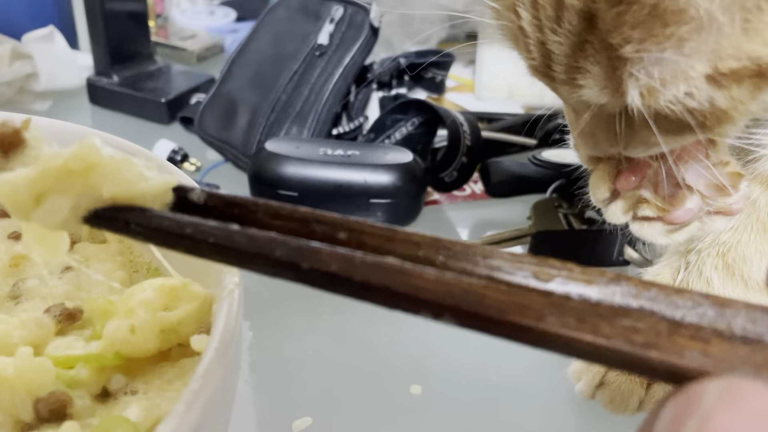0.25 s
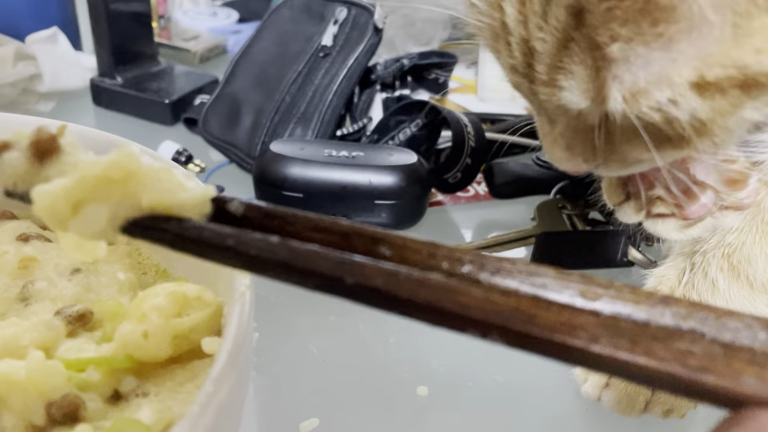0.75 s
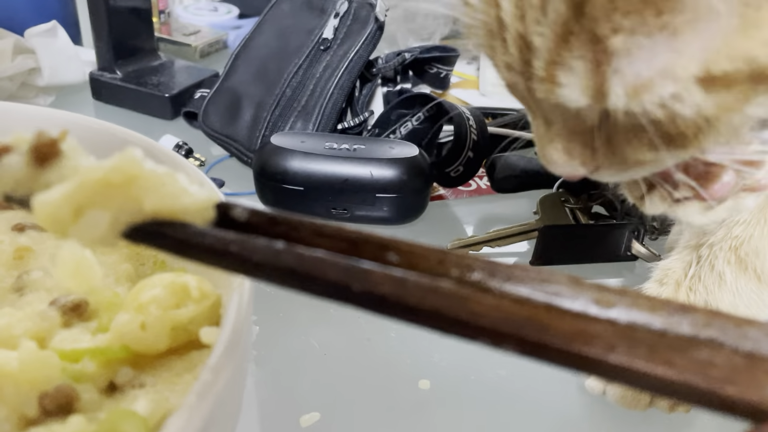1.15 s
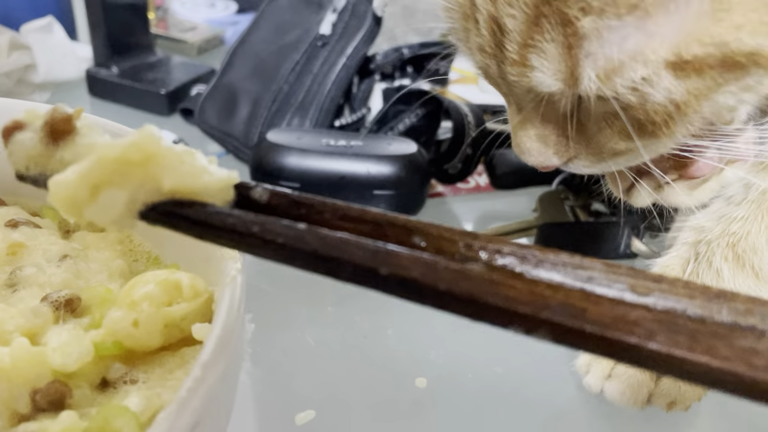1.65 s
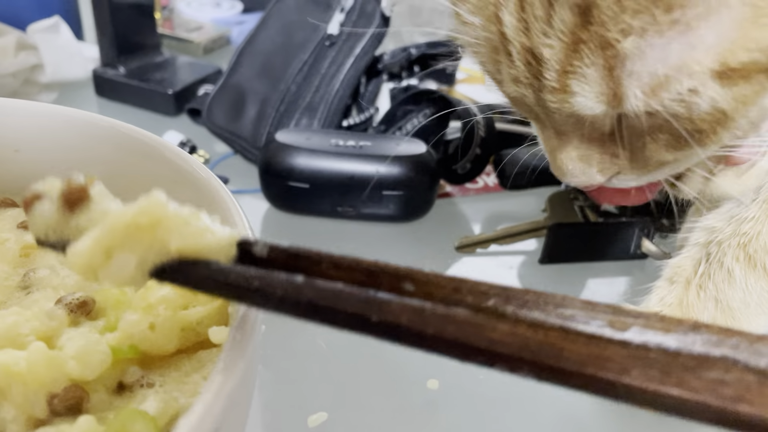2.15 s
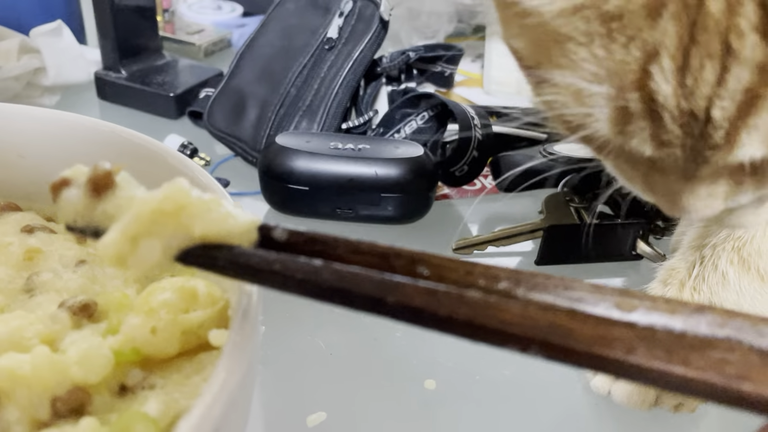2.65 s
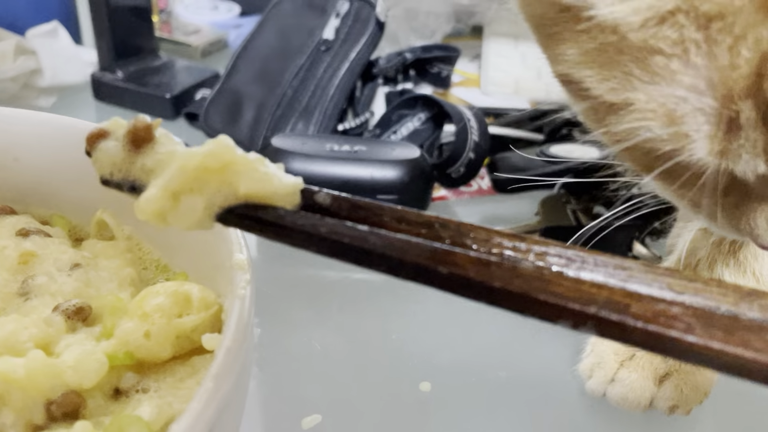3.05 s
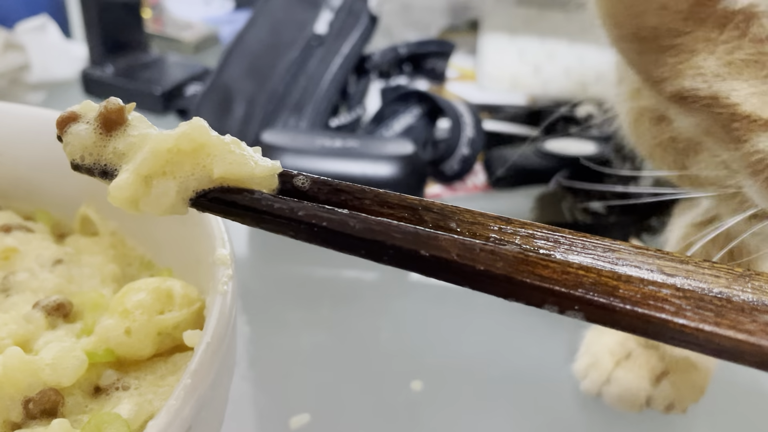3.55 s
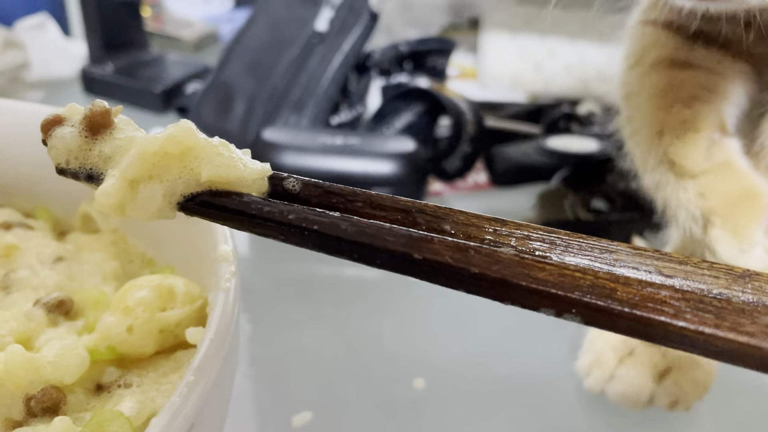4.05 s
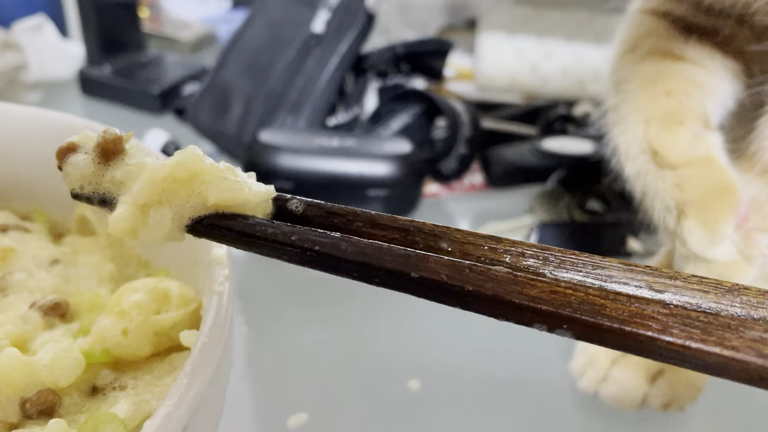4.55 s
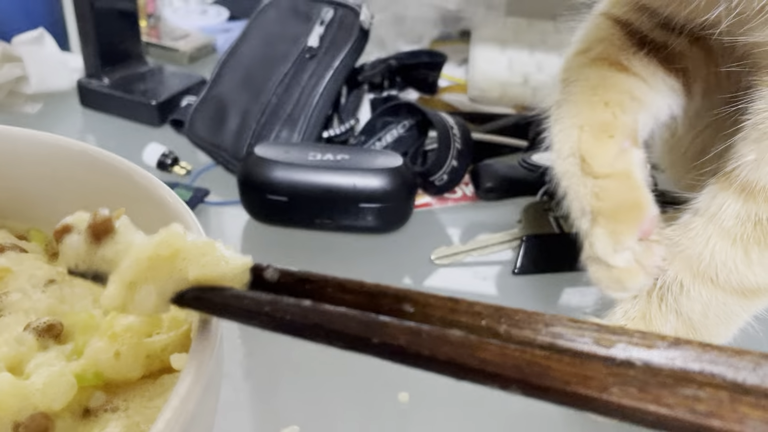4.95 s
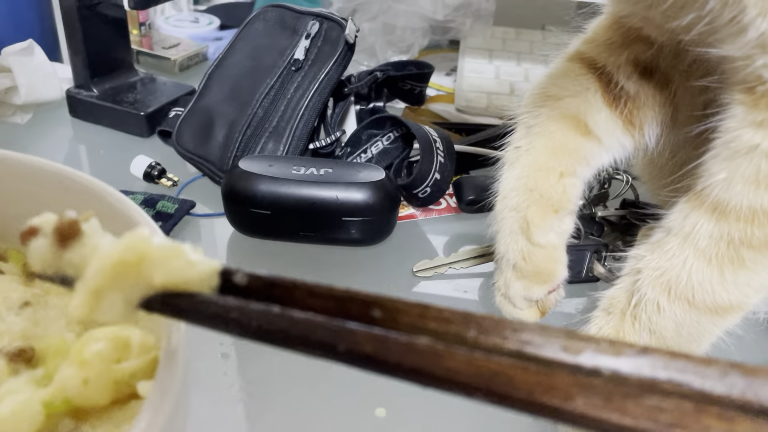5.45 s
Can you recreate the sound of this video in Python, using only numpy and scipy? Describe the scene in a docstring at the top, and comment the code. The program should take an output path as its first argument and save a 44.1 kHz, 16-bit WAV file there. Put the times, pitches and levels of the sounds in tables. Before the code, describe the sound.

A kitten licks and chews sticky food with small wet smacks while wooden chopsticks occasionally tap a ceramic bowl over a low, slowly pulsing hum.

```python
"""Kitten licking, chopstick taps, hum

A kitten licks sticky food in a small quiet room: smacks (noise grains through mouth resonances), saliva ticks
(bright noise bursts) and a rustle (flickering noise, faint pops). Wooden chopsticks tap a ceramic bowl five times
(clicks ringing modes, plus room echoes). A motor just under mains frequency beats slowly with the mains buzz
(sines) over faint room noise. The treble's left-right phase turns steadily with frequency."""
import sys
import numpy as np
from scipy import signal
from scipy.fft import rfft, irfft
from scipy.io import wavfile

SR = 44100
rng = np.random.default_rng(int(sys.argv[2]) if len(sys.argv) > 2 else 0)


def int16_out(signal):
    """Quantize to a 16-bit WAV file."""
    q = np.round(np.clip(np.atleast_2d(signal).T, -1, 1) * 32767)
    wavfile.write(sys.argv[1], SR, q.astype(np.int16))


N = 250929
T = np.arange(N) / SR


def amp(db):
    """dB to gain."""
    return 10 ** (np.asarray(db) / 20)


def rms_one(x):
    """Scale to rms 1."""
    return x / np.sqrt(np.mean(x ** 2) + 1e-20)


def at_hz(points, hz):
    """Read a spectrum table on a log-frequency axis."""
    table_hz, values = np.array(points).T
    return np.interp(np.log(hz + 1), np.log(table_hz), values)


def panned(left_right_db):
    """Left and right gains for a level difference."""
    return amp(np.array([[.5], [-.5]]) * left_right_db)


def drift(rate_hz):
    """Slow random curve of rms 1: noise through two equal poles, at 1/40 of the sample rate."""
    r = np.exp(-2 * np.pi * rate_hz * 40 / SR)
    white = rng.standard_normal(N // 40 + 2002)
    slow = signal.lfilter([1], [1, -2 * r, r * r], white)[2000:]   # drop the settling
    return np.interp(np.arange(N) / 40, np.arange(len(slow)), rms_one(slow))


def resonance(x, hz, width_hz):
    """Two-pole band-pass with gain 1 on top."""
    r = np.exp(-np.pi * width_hz / SR)
    poles = [1, -2 * r * np.cos(2 * np.pi * hz / SR), r * r]
    return signal.lfilter([(1 - r * r) / 2, 0, (r * r - 1) / 2], poles, x)


def ring(clicks, hz, t60_s):
    """A unit click sets a dying sine of height 1 ringing."""
    r, w = amp(-60 / (t60_s * SR)), 2 * np.pi * hz / SR
    return signal.lfilter([0, np.sin(w)], [1, -2 * r * np.cos(w), r * r], clicks)


def stereo_noise(alike, size):
    """Two white noises with the given likeness (correlation)."""
    mid, side = rng.standard_normal((2, size))
    return np.sqrt((1 + alike) / 2) * mid + np.sqrt((1 - alike) / 2) * side * [[1], [-1]]


def add(out, s, sound):
    """Mix a short sound in at time s."""
    i = round(s * SR)
    out[..., i:i + sound.shape[-1]] += sound[..., :N - i]


def patchy_noise(spectrum, patchy_db, rate_hz, alike):
    """Stereo noise in third-octave bands, every fourth band sharing a flicker; rms 1."""
    hz = np.fft.rfftfreq(N, 1 / SR)
    in_range = (hz > spectrum[0][0]) * (hz < spectrum[-1][0])
    mid, side = rfft(rng.standard_normal((2, N))) * amp(at_hz(spectrum, hz)) * in_range
    both = np.sqrt(1 + alike) * mid + np.sqrt(1 - alike) * side * [[1], [-1]]
    place = 3 * np.log2(np.maximum(hz, 400))   # in third-octaves
    out = 0
    for turn in range(4):
        distance = np.abs((place - turn + 2) % 4 - 2)
        share = np.cos(np.pi / 2 * np.clip(distance, 0, 1))
        out = out + irfft(both * share, N) * amp(patchy_db * drift(rate_hz))
    return rms_one(out)


# motor, mains partials: order, left/dB, right/dB
MOTOR_PARTIALS = [(1, -44.6, -43.3), (3, -75, -73)]
MAINS_PARTIALS = [(1, -58, -57), (2, -58, -55.5), (3, -77, -71), (4, -79, -70), (6, -80, -82),
                  (8, -83, -82), (10, -82, -82), (12, -80, -90), (14, -79, -83), (16, -82, -95)]
MOTOR_HZ, MAINS_HZ = 49.31, 50.03
IN_STEP_S = .726   # motor and mains push together
WHINE_HZ, WHINE_MEDIAN_DB = 398.1, -73


def hum():
    """Steady sines of motor and mains beat; a whine wavers a little in level and phase."""
    turn = 2 * np.pi * (T - IN_STEP_S)
    out = np.zeros((2, N))
    for base_hz, partials in ((MOTOR_HZ, MOTOR_PARTIALS), (MAINS_HZ, MAINS_PARTIALS)):
        for order, left_db, right_db in partials:
            out += amp([[left_db], [right_db]]) * np.cos(order * base_hz * turn)
    whine_level = amp(WHINE_MEDIAN_DB + 1.85 * drift(1.0))
    whine_phase = WHINE_HZ * turn + .5 * drift(0.31) + [[0], [.8]]
    return out + whine_level * np.cos(whine_phase)


# room noise spectrum: f/Hz, density/dB per Hz (relative)
AIR_COLOUR = [(35, -36.5), (60, -8.5), (119, -13.5), (146, -17), (242, -22.5), (393, -25.5), (443, -30),
              (1170, -33.5), (1400, -37), (2020, -36), (2680, -50.5), (6380, -56.5), (7500, -92),
              (9750, -95), (16500, -120)]
# room noise balance: f/Hz, left-right/dB
AIR_BALANCE = [(60, -1), (350, -2), (900, 3), (1700, 0.5), (2500, 0.5), (5000, 0), (7500, -2)]
# left-right likeness: f/Hz, correlation
LIKENESS = [(60, 0.53), (130, 0.99), (350, 0.5), (700, 0.11), (1300, -0.82), (1900, 0.71), (4000, 0.89),
            (7000, 1)]
# faint duct whistles: f/Hz, width/Hz, median level/dB
WHISTLES = [(1151, 260, -79.5), (1755, 156, -82.5), (2062, 28, -80)]
AIR_DB = -60


def air():
    """Flickering room noise, plus noise through narrow resonances as faint whistles."""
    hz = np.fft.rfftfreq(N, 1 / SR)
    alike = np.clip(at_hz(LIKENESS, hz), -1, 1)
    noise = patchy_noise(AIR_COLOUR, 1.1, 4.4, alike)
    out = amp(AIR_DB) * irfft(rfft(noise) * panned(at_hz(AIR_BALANCE, hz)), N)
    for f_hz, width_hz, db in WHISTLES:
        narrow = resonance(stereo_noise(0.47, N), f_hz, width_hz)
        narrow = resonance(narrow, f_hz, width_hz)
        out = out + amp(db + 2 * drift(12)) * rms_one(narrow)
    return out


# faint pops spectrum: f/Hz, density/dB per Hz (relative)
POP_COLOUR = [(2600, -8.5), (3500, -7.5), (4500, -6.5), (6000, -2.5), (7300, -9.5)]


def faint_pops(per_s, t60_s):
    """Small pops at random moments and pitches, each a narrow noise that starts at once and dies; rms 1."""
    out, r = 0, amp(-60 / (t60_s * SR))
    pitches_hz = np.geomspace(2600, 7300, 12)
    for hz in pitches_hz:
        starts = rng.random(N) < per_s / len(pitches_hz) / SR
        born = starts * amp(0.94 * rng.standard_normal(N))
        dying = signal.lfilter([1], [1, -r], born + 1e-9)
        band = resonance(stereo_noise(0.17, N) * dying, hz, 0.052 * hz)
        band = resonance(band, hz, 0.068 * hz)
        out = out + amp(at_hz(POP_COLOUR, hz)) * band / np.sqrt(hz)
    return rms_one(out)


# bright rustle spectrum: f/Hz, density/dB per Hz (relative)
RUSTLE_COLOUR = [(6500, -4.5), (7600, -10), (8500, -4), (10000, 0.5), (12500, -2.5), (14500, -0.5),
                 (15800, -4.5)]
# stroke spectrum: f/Hz, density/dB per Hz (relative)
STROKE_COLOUR = [(6500, -8.5), (8500, -2.5), (10300, -1), (12500, -3.5), (15800, -13)]
# background, before flicker and pan: t/s, bright rustle level/dB, faint pops level/dB
RUSTLE_FLOOR = [(0.0, -69, -71), (0.24, -75, -82.5), (0.76, -71, -72.5), (1.03, -71.5, -81.5),
                (1.76, -73.5, -74), (1.84, -72, -73), (2.87, -73.5, -83.5), (3.04, -70.5, -75.5),
                (3.18, -72, -73.5), (3.3, -70.5, -66), (3.53, -76.5, -80), (4.44, -76.5, -76),
                (4.74, -76, -81.5), (5.09, -74.5, -77.5), (5.53, -77, -88), (5.69, -78, -88)]
# tongue strokes, before flicker: t/s, length/s, level/dB
STROKES = [(0.01, 0.055, -74), (0.19, 0.034, -81), (0.32, 0.022, -68), (0.373, 0.046, -68.5),
           (0.5, 0.049, -77.5), (0.642, 0.028, -64.5), (0.774, 0.023, -62), (0.917, 0.035, -64),
           (1.147, 0.11, -64.5), (1.609, 0.13, -70), (1.88, 0.025, -72), (2.1, 0.047, -72),
           (2.335, 0.056, -68), (2.5, 0.018, -74), (2.755, 0.021, -73), (3.067, 0.056, -70.5),
           (3.23, 0.078, -73), (3.388, 0.037, -66), (3.487, 0.02, -64), (3.787, 0.045, -69),
           (3.885, 0.034, -66.5), (4.129, 0.055, -67), (4.68, 0.02, -81), (4.789, 0.03, -72),
           (4.893, 0.05, -69), (5.163, 0.05, -74), (5.4, 0.027, -78), (5.57, 0.024, -72.5)]
STROKE_ATTACK_S, STROKE_T60_S = 0.02, 0.16


def rustle():
    """Tongue strokes swell over a flickering bright rustle (mono); faint pops (stereo) below it."""
    s, bright_db, pops_db = np.transpose(RUSTLE_FLOOR)
    strokes, t = np.zeros(N), T[:SR // 2]
    for start_s, length_s, stroke_db in STROKES:
        attack = np.minimum(t / STROKE_ATTACK_S, 1)
        release_db = -60 * np.maximum(t - length_s, 0) / STROKE_T60_S
        add(strokes, start_s, amp(stroke_db + release_db) * attack)
    floor = amp(np.interp(T, s, bright_db)) * patchy_noise(RUSTLE_COLOUR, 3.6, 8.8, alike=1)[0]
    licks = strokes * patchy_noise(STROKE_COLOUR, 3.8, 12, alike=1)[0]
    bright = amp(2.16 * drift(50)) * (floor + licks)
    pops = amp(np.interp(T, s, pops_db)) * faint_pops(per_s=320, t60_s=0.13) * panned(-3.5)
    return bright, pops


# wet smacks: t/s, drive level/dB, mouth resonance f/Hz, spatter t60/s
SMACKS = [(0.012, -60, 1920, 0.07), (0.126, -72.5, 2800, 0.2), (0.204, -66, 2590, 0.13),
          (0.257, -68, 3500, 0.15), (0.327, -71, 3640, 0.17), (0.368, -61.5, 2240, 0.16),
          (0.385, -66, 2770, 0.17), (0.47, -74, 5100, 0.14), (0.514, -75, 3600, 0.24),
          (0.535, -68.5, 6700, 0.13), (0.537, -69, 2550, 0.24), (0.596, -67, 3370, 0.089),
          (0.7, -54.5, 2060, 0.097), (0.718, -61, 2590, 0.24), (0.784, -68, 5680, 0.19),
          (0.867, -60.5, 1890, 0.22), (0.884, -69.5, 2450, 0.35), (0.918, -66.5, 4160, 0.17),
          (0.945, -63, 3050, 0.08), (1.366, -64, 2840, 0.031), (1.486, -70.5, 5670, 0.11),
          (1.566, -55, 3830, 0.12), (1.567, -64.5, 4250, 0.27), (1.721, -61.5, 3580, 0.14),
          (1.837, -61, 2570, 0.2), (1.873, -66, 3100, 0.14), (2.097, -75, 6200, 0.25),
          (2.131, -69, 4460, 0.11), (2.436, -57, 2650, 0.14), (2.513, -75, 6070, 0.27),
          (2.64, -79, 6460, 0.19), (2.687, -69.5, 3240, 0.18), (2.776, -61, 2910, 0.14),
          (2.98, -66.5, 5700, 0.12), (3.098, -68.5, 4900, 0.089), (3.16, -68, 3820, 0.13),
          (3.161, -59, 2790, 0.15), (3.183, -61, 2710, 0.089), (3.242, -63, 3740, 0.085),
          (3.281, -63.5, 4480, 0.11), (3.285, -62, 3260, 0.094), (3.297, -62.5, 2330, 0.12),
          (3.345, -66.5, 2500, 0.19), (3.371, -72, 3320, 0.37), (3.664, -75, 4360, 0.27),
          (3.74, -57, 2790, 0.12), (3.766, -56.5, 4240, 0.15), (3.802, -70.5, 3160, 0.14),
          (3.844, -79, 6330, 0.24), (4.021, -61, 3310, 0.11), (4.111, -69.5, 3550, 0.18),
          (4.225, -62, 2270, 0.099), (4.264, -65, 2350, 0.3), (4.369, -64.5, 4030, 0.11),
          (4.404, -77, 6130, 0.17), (4.534, -67, 2530, 0.15), (4.598, -68, 2920, 0.16),
          (4.789, -73, 2850, 0.21), (4.879, -57.5, 4200, 0.078), (4.879, -64, 3230, 0.13),
          (4.92, -64.5, 6000, 0.23), (4.92, -63, 3480, 0.12), (4.942, -62.5, 1660, 0.11),
          (5.3, -75, 3920, 0.11), (5.415, -74.5, 3700, 0.12), (5.528, -72, 3290, 0.18)]
# higher smacks lie further right: f/Hz, left-right/dB
SMACK_PAN = [(1900, 0), (6000, -5.5)]
SMACK_CYCLES = 26   # how long the mouth rings
SMACK_WIDTH = .4   # skirt of the mouth resonance, share of its pitch
SMACK_ONSET, SMACK_SWELL_S = 0.91, 0.0082   # share sounding at once; the rest swells in


def smacks():
    """A film of saliva breaks: a snap and a dying spatter of uneven noise grains, ringing in the mouth."""
    out, t = np.zeros((2, N)), T[:8192]
    for s, level_db, hz, t60_s in SMACKS:
        grain_db = 2.2 * rng.standard_normal(8192 // 64).repeat(64)
        grains = stereo_noise(0.55, 8192) * amp(grain_db)
        swell = np.minimum(SMACK_ONSET + t / SMACK_SWELL_S * (1 - SMACK_ONSET), 1)
        spatter = grains * amp(-60 * t / t60_s) * swell
        narrow_hz, wide_hz = 2.3 * hz / SMACK_CYCLES, SMACK_WIDTH * hz
        rung = resonance(resonance(spatter, hz, narrow_hz), hz, wide_hz) / np.sqrt(narrow_hz / SR)
        snap = amp(-28) * resonance(grains * amp(-60 * t / 0.0048), hz, hz)
        add(out, s, amp(level_db) * panned(at_hz(SMACK_PAN, hz)) * (rung + snap))
    return out


# saliva ticks: t/s, peak before high-pass/dB, centre f/Hz
TICKS = [(0.1511, -54, 11300), (0.1964, -49, 15300), (0.2038, -53, 15400), (0.644, -46, 12500),
         (0.783, -50, 10800), (0.943, -46, 10900), (1.7433, -49, 9530), (1.7674, -44, 11100),
         (2.7585, -47, 11200), (3.23, -53, 14600), (3.4165, -56, 11900), (3.4254, -49, 11800),
         (3.729, -56, 14500), (4.239, -58, 9930), (4.2945, -58, 13800), (5.0953, -38, 11900)]
TICK_ATTACK_S, TICK_T60_S, TICK_WIDTH_HZ = .0009, .007, 6000


def ticks():
    """Threads of saliva snap: bright noise bursts dying in milliseconds."""
    out, t = np.zeros(N), T[:512]
    for s, peak_db, hz in TICKS:
        envelope = amp(-60 * t / TICK_T60_S) * np.minimum(t / TICK_ATTACK_S, 1)
        burst = resonance(rng.standard_normal(512) * envelope, hz, TICK_WIDTH_HZ)
        add(out, s, amp(peak_db) * burst / np.abs(burst).max())
    return signal.sosfilt(signal.butter(8, 8000, "high", fs=SR, output="sos"), out)


# chopsticks on the bowl: t/s, strength/dB, contact brightness f/Hz, bowl ring/dB, left-right/dB
TAPS = [(2.1899, -25.5, 6850, 4.5, -4.5), (2.389, -28, 6160, -7.5, 0.5), (4.6847, -38, 2070, -18, -4.5),
        (4.9992, -28.5, 2680, 1, -6), (5.2012, -28.5, 2600, 0, -3)]
# knock modes of sticks and table: f/Hz, level re tap/dB, t60/s, left-right re tap/dB
STICK_MODES = [(174, -25, 0.041, -4), (244, -16, 0.012, 3), (343, -18.5, 0.023, -1), (455, -25, 0.051, 4),
               (750, -14.5, 0.007, -10), (1187, -2.5, 0.01, 1.5), (1540, -5.5, 0.0065, 9),
               (1895, -13.5, 0.011, -12), (3430, -5, 0.0047, -13.5), (5650, -7, 0.00091, -22),
               (10550, 1, 0.007, 22)]
# bowl modes: f/Hz
BOWL_HZ = [1760, 2652, 4570, 5026]
# same bowl modes: level re tap's bowl ring/dB, t60/s
BOWL_MODES = [(-22, 0.065), (-22, 0.046), (-13, 0.058), (-23, 0.049)]
CRACK_T60_S = .014
HARD_EDGE_DB = -29   # part of the contact that stays sharp however soft the tap
TABLE_CANCEL_HZ = 988   # the reflection off the table cancels the knock here


def taps():
    """Each tap cracks, knocks sticks and table, whose lows arrive later, and rings the bowl."""
    out = np.zeros((2, N))
    for s, tap_db, bright_hz, bowl_db, pan_db in TAPS:
        softness = signal.butter(4, bright_hz, fs=SR, output="sos")
        contact = np.zeros(8192)
        contact[[0, 14]] = .4, 1   # graze, then blow
        soft = signal.sosfilt(softness, contact + 1e-18)
        click = amp(tap_db) * (soft + amp(HARD_EDGE_DB) * contact)
        crack = stereo_noise(0.29, 1024) * amp(tap_db + 3.5 - 60 * T[:1024] / CRACK_T60_S)
        add(out, s, panned(pan_db) * resonance(signal.sosfilt(softness, crack), 3100, 2900))
        for k, (hz, db, t60_s, side_db) in enumerate(STICK_MODES):
            sign = (-1) ** k   # neighbouring modes swing in opposite sense
            add(out, s + 0.89 / hz, sign * amp(db) * panned(pan_db + side_db) * ring(click, hz, t60_s))
        for hz, (db, t60_s) in zip(BOWL_HZ, BOWL_MODES):
            add(out, s, amp(db + bowl_db) * panned(pan_db) * ring(click, hz, t60_s))
    return out - 0.82 * resonance(out, TABLE_CANCEL_HZ, 184)


ROOM_T60_S, ROOM_DB = 0.13, -19


def room(x):
    """Dense dying echoes as band-limited noise, other ones left and right."""
    t = T[:SR // 3]
    onset = np.clip((t - .002) / 0.00068, 0, 1)
    tail = rng.standard_normal((2, len(t))) * amp(-60 * t / ROOM_T60_S) * onset
    tail = signal.sosfilt(signal.butter(1, [300, 4000], "band", fs=SR, output="sos"), tail)
    tail /= np.sqrt(np.sum(tail ** 2, axis=1, keepdims=True))
    return amp(ROOM_DB) * signal.fftconvolve(x, tail, axes=1)[:, :N]


PHASE_TURN_S, PHASE_ZERO_HZ = 1 / 4900, 10750


def treble_phase(x):
    """Right treble is left treble with phase turning once per 4900 Hz, aligned at 10750 Hz."""
    hz = np.fft.rfftfreq(N, 1 / SR)
    turned = np.exp(-2j * np.pi * (hz - PHASE_ZERO_HZ) * PHASE_TURN_S)
    return np.array([x, irfft(rfft(x) * turned, N)])


def scene():
    """All sources together; the treble gets its left-right phase turn, only the knocks echo."""
    bright, pops = rustle()
    knocks = taps()
    low = signal.sosfilt(signal.butter(6, 7500, fs=SR, output="sos"), knocks)
    high = signal.sosfilt(signal.butter(6, 7500, "high", fs=SR, output="sos"), knocks[0])
    treble = treble_phase(high + bright + ticks())
    return hum() + air() + pops + smacks() + low + room(knocks) + treble


def record(dry):
    """Steep low-pass near 16 kHz."""
    stop_hz = 15900 * 1.03
    return signal.sosfilt(signal.cheby2(14, 70, stop_hz, fs=SR, output="sos"), dry)


dry = scene()
out = record(dry)
int16_out(out)
```